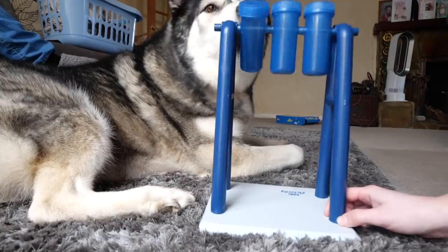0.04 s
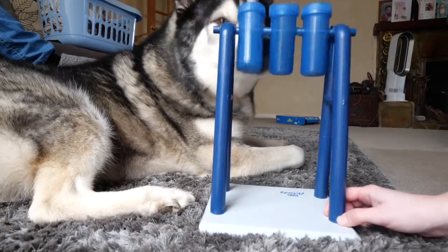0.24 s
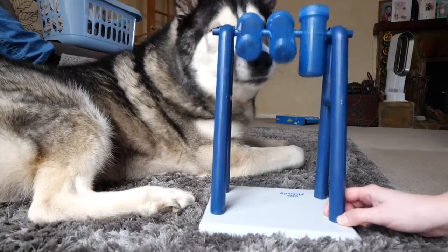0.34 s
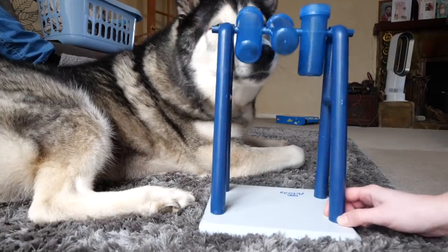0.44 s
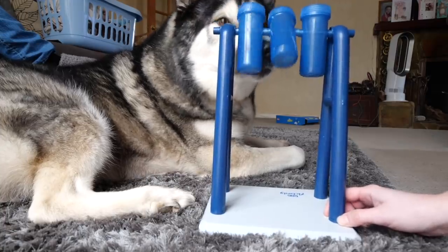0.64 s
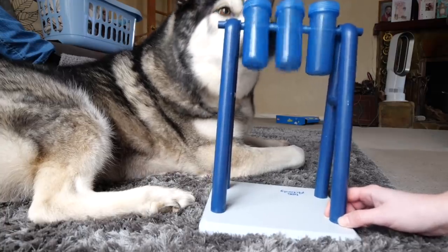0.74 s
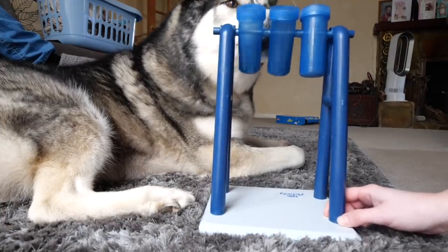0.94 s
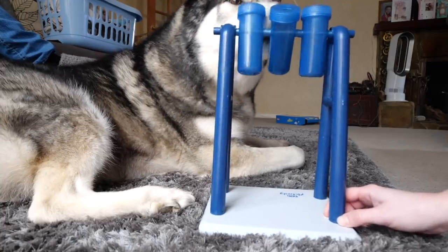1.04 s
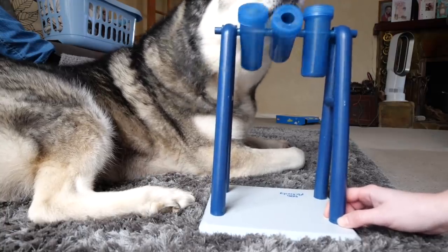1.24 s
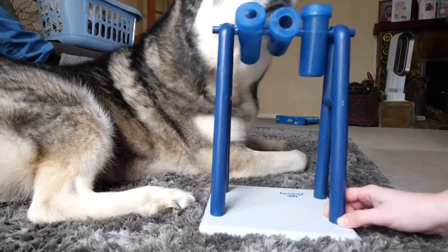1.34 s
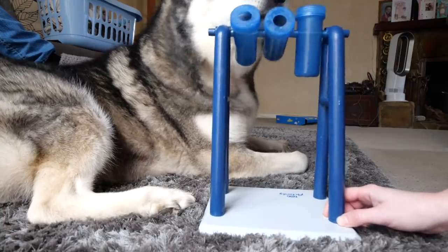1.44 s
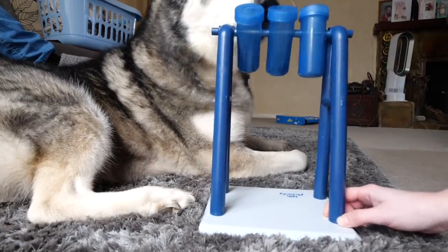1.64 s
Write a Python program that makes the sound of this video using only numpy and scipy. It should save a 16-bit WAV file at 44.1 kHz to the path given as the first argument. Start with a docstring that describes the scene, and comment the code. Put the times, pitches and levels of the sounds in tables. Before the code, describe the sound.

Plastic puzzle toy knocking and clicking under a dog's nose, dry treats tumbling within.

```python
"""A carpeted room: a dog noses a treat puzzle, three hard plastic tubes swinging on a crossbar.
The tubes knock and click against the bar, soft shoves thud through the stand, and dry treats
tumble inside and ping against the tube walls. Each blow is a crack, a noise shudder and ringing
modes; sliding, scraping and pouring are dense tiny impulses. A short room tail follows the blows."""
import sys
import numpy as np
from scipy import signal
from scipy.fft import rfft, irfft
from scipy.io import wavfile
from scipy.ndimage import uniform_filter1d

SR = 44100
rng = np.random.default_rng(int(sys.argv[2]) if len(sys.argv) > 2 else 0)


def unload_audio(sound):
    """Save the sound as a 16-bit wav file, at the path given as the first command line argument."""
    columns = np.transpose(np.atleast_2d(sound))
    # keep every value between -1 and 1, then stretch to whole-number steps
    steps = np.round(np.clip(columns, -1, 1) * 32767)
    wavfile.write(sys.argv[1], SR, steps.astype(np.int16))


N = 74970
SIZE = 16384  # samples per impulse response
HZ = np.maximum(np.fft.rfftfreq(SIZE, 1 / SR), 1)
AGE_S, TIME_S = np.arange(SIZE) / SR, np.arange(N) / SR

# blows: start_s, level_db, tilt_db_per_oct
STAND_SHOVES = [(0.248, -48, -21), (0.3389, -27.5, 3), (0.4559, -32, -4.5), (0.584, -33, 3),
                (0.7245, -38, -4), (0.7386, -34, -2.5), (0.859, -27, 0.5), (0.8889, -24.5, 1.5),
                (1.265, -40.5, -2.5), (1.283, -38, -1.5), (1.3033, -25, 2)]
TREAT_HITS = [(0.3278, -35, 7), (.3808, -38.5, 0), (0.4683, -29, -0.5), (0.5036, -46, 5), (.5694, -22, 14),
              (0.5815, -40, 0), (.5866, -39, 17), (0.6051, -32, 12), (0.747, -31, 3), (0.756, -26, 6),
              (0.773, -31.5, -1), (0.8669, -17.5, -2), (0.8754, -22, 5), (.880, -32, 8), (.9041, -25, 2.5),
              (.9115, -32.5, 3.5), (0.9208, -19, 5.5), (0.9333, -29.5, -2), (.9393, -31, 3),
              (1.0298, -40, -1), (1.0693, -31.5, -4), (1.1238, -43.5, -4), (1.275, -37, 0.5),
              (1.5326, -36.5, 1.5), (1.5699, -35, -6.5)]
TUBE_KNOCKS = [(0.2061, -24.5, 1.5), (0.235, -34.5, 4), (0.247, -28.5, -0.5), (0.3346, -29, -1.5),
               (0.3455, -20.5, 0), (0.3478, -19, 1.9), (0.3534, -26.5, 6), (.358, -22, 1),
               (0.4349, -27.5, -2.5), (0.4489, -26.5, 0.5), (0.6602, -23.5, -1.5), (0.683, -32.5, -6),
               (0.7212, -32, -2.5), (0.813, -33, 0.5), (.896, -30, -4.5), (1.0999, -36.5, -3.5),
               (1.170, -45, -1.5), (1.5992, -36.5, 4.5)]
# plastic on plastic: start_s, level_db, tilt_db_per_oct, crack_share
EDGE_CLICKS = [(0.0251, -36, -2.5, 0.37), (0.0593, -43, -2, 0.94), (0.268, -37, -5.5, 1),
               (0.2723, -27.5, -4.5, 0.92), (0.2803, -31, -6, 0.1), (.2884, -36, -2, 0.3),
               (0.2966, -27.5, -1, 0.04), (.348, -26.5, 5.5, 0.36), (0.4344, -27, -4, 0),
               (0.4445, -31, -1.5, 0.4), (0.5617, -36.5, -8.5, 0.16), (.7487, -30.5, 2.5, 0),
               (0.796, -31.5, -7, 0.8), (0.8343, -30, -2.5, 0), (0.865, -29.5, 26, 0.2),
               (0.8727, -22.5, -3, 1), (0.8753, -29.5, 0, 0.98), (0.9476, -33, -6.5, .3),
               (0.9614, -27, 1.5, 0.53), (0.9746, -35, -2.5, 0.98), (1.3291, -25, 4.5, 0),
               (1.341, -34, 4, 0), (1.3522, -26, 12, 0.14), (1.3637, -39, 8, 0.2), (1.408, -29, 3, 0.6),
               (1.4195, -41, 0, 0.2), (1.4508, -37, 2, .1)]
# treats running down a tube: start_s, length_s, level_db
TREAT_POURS = [(0.741, .05, -36.5), (0.869, .14, -37.5)]
# sliding envelope: time_s, level_db
SLIDE_LEVELS = [(0, -44), (.10, -56.5), (.195, -51.5), (0.237, -40.5), (.47, -43), (.54, -48), (.655, -50),
                (.77, -43), (0.851, -43.5), (.87, -37), (.95, -47), (1.0, -50), (1.11, -49.5), (1.25, -57),
                (1.288, -45.5), (1.49, -50), (1.59, -40), (1.70, -48.5)]
# source spectra: freq_hz, gain_db
HISS_SPECTRUM = [(30, -22), (200, 10), (800, -22), (3000, -13), (10000, 0), (16000, -19)]
SLIDE_SPECTRUM = [(40, -38), (210, 4), (450, -5), (780, 6), (1150, -2.5), (2100, 0.5), (4500, -6.5),
                  (5600, -4.5), (7500, -11.5), (9800, -13), (12000, -20), (16000, -33)]
THUD_SPECTRUM = [(30, -20), (120, -20.5), (225, 2.5), (350, -2.5), (500, -8), (630, -7.5), (900, 6.5),
                 (1400, -10.5), (2200, -14.5), (4000, -41), (16000, -70)]
CLICK_SPECTRUM = [(60, -36), (240, -24), (800, -14), (2200, 3.5), (3900, 1.5), (5600, 1.5), (8000, -1.5),
                  (9800, 0), (12500, -19), (16000, -32)]
TREAT_SPECTRUM = [(60, -37), (280, -35), (1500, -4.5), (3000, -4), (3750, 5.5), (4400, -0.5), (5600, 6),
                  (8000, -4.5), (9800, -6), (12500, -23), (16000, -45)]
KNOCK_SPECTRUM = [(60, -55), (200, -11.5), (620, -10.5), (890, 6), (1150, -5.5), (1500, 0), (2150, -0.5),
                  (2700, -14), (3900, -9), (6000, -23), (10000, -28), (16000, -43)]
# resonances: pitch_hz, level_db, t60_s
STAND_RING = [(220, -1.4, .075), (429, 0.28, 0.056), (522, -2, 0.059), (781.6, -2.6, 0.094),
              (908.4, 0.76, 0.072)]
WALL_RING = [(3731, 1.5, 0.08), (5370, -1.5, 0.06), (5550, -1, 0.098), (6030, -0.5, 0.031)]
TUBE_RING = [(722, 1, 0.44), (798, -1, 0.04), (940, -19, 0.059), (1343, -10, 0.72), (1423, 1.5, 0.087),
             (1833, -5.5, 0.16), (2113, 5, 0.077), (2320, -8, 0.059)]
# room band decay, before the tail's overall fade: freq_hz, t60_s
ROOM_DECAY = [(150, 0.9), (1000, 0.02), (3000, 0.57), (8000, 1.2), (15000, 0.54)]
# room tail spectrum: freq_hz, gain_db
ROOM_SPECTRUM = [(80, -12.5), (200, -8), (450, -9), (1000, -11.5), (5500, -8.5), (15000, -17.5)]
# stereo balance: freq_hz, left_minus_right_db
BALANCE = [(250, 0), (700, -2), (1600, -3), (11000, 1)]
# stereo width: freq_hz, side_gain_db
WIDTH = [(50, 0), (160, -22.5), (1400, -11.5), (9000, -21.5), (14000, 0)]


def from_db(db):
    """Decibels to gain."""
    return 10 ** (np.asarray(db) / 20)


def unit(x):
    """Scale to unit energy."""
    return x / np.sqrt(np.sum(x ** 2) + 1e-20)


def at_hz(table, hz=HZ):
    """Interpolate over log frequency."""
    freqs_hz, values = np.transpose(table)
    return np.interp(np.log(hz), np.log(freqs_hz), values)


def fade(t60_s):
    """Free decay, 60 dB in t60_s."""
    return np.exp(-np.log(1000) * AGE_S / t60_s)


def causal(gain_db):
    """Minimum-phase impulse response of a gain curve."""
    cepstrum = irfft(gain_db * np.log(10) / 20)
    fold = 1 + np.sign(SIZE // 2 - np.arange(SIZE)) - (AGE_S == 0)
    return irfft(np.exp(rfft(cepstrum * fold)))


def through(x, response):
    """Filter x, keeping its length."""
    return signal.fftconvolve(x, response)[:len(x)]


def evened(x, t60_s):
    """Flatten a burst's chance spectral peaks, then fade it; unit energy."""
    spectrum = rfft(x)
    flat = irfft(spectrum / np.sqrt(np.abs(spectrum) ** 2 + np.sum(x ** 2) / 10))
    return unit(flat * fade(t60_s))


def dying_noise(t60_s_at):
    """Dense resonances: 12 noise bands, each with its own decay; unit energy."""
    edges_hz = np.geomspace(100, 18000, 13)
    white = rfft(rng.standard_normal(SIZE))
    out = 0
    for low, high in zip(edges_hz, edges_hz[1:]):
        band = irfft(white * (HZ >= low) * (HZ < high))
        out += np.sqrt(high - low) * unit(band * fade(t60_s_at(np.sqrt(low * high))))
    return unit(out)


def ringing(modes, scatter_db=4.5, detune=0.003):
    """Struck modes rising over one cycle; level and pitch vary per blow; unit energy."""
    out = 0
    for k, (pitch_hz, level_db, t60_s) in enumerate(modes):
        gain = (-1) ** k * from_db(level_db + scatter_db * rng.normal())
        tone = np.cos(2 * np.pi * pitch_hz * (1 + detune * rng.normal()) * AGE_S)
        out += gain * unit(tone * np.minimum(pitch_hz * AGE_S, 1) * fade(t60_s))
    return unit(out)


def contact(spectrum, crack_share, decay_s, swell_s=0.00061):
    """A crack plus a shudder that swells as the plastic flexes, treble dying first; unit energy."""
    shudder = dying_noise(lambda hz: decay_s * (1000 / hz) ** 0.74)
    shudder = evened(shudder, 2 * decay_s) * (1 - np.exp(-AGE_S / swell_s))
    burst = np.sqrt(crack_share) * (AGE_S == 0) + np.sqrt(1 - crack_share) * unit(shudder)
    return unit(through(burst, causal(at_hz(spectrum))))


def add_blow(track, start_s, level_db, tilt_db_per_oct, attack, ring, window_s=0.005):
    """Tilt and mix in one blow; level_db is the attack's energy spread over window_s."""
    slope = causal(tilt_db_per_oct * np.log2(np.clip(HZ, 200, 12000) / 1000))
    gain = from_db(level_db) * np.sqrt(window_s * SR / np.sum(through(attack, slope) ** 2))
    start = int(start_s * SR)
    track[start:start + SIZE] += gain * through(attack + ring, slope)[:N - start]


def grains(spectrum, rate_per_s):
    """Tiny slips: equal impulses of random sign and timing, filtered; unit rms."""
    slips = rng.choice([-1, 1], N) * (rng.random(N) < rate_per_s / SR)
    return np.sqrt(N) * unit(through(slips, causal(at_hz(spectrum))))


def room_tone(level_db=-60):
    """Faint steady hiss."""
    hiss = through(rng.standard_normal(N), causal(at_hz(HISS_SPECTRUM)))
    return from_db(level_db) * np.sqrt(N) * unit(hiss)


def room_tail(x, onset_s=0.0013):
    """Short tail of a furnished room, different for each spot on the toy."""
    tail = evened(dying_noise(lambda hz: at_hz(ROOM_DECAY, hz)), t60_s=0.31)
    tail *= np.clip(AGE_S / onset_s - 1, 0, 1)
    return through(x, through(unit(tail), causal(at_hz(ROOM_SPECTRUM))))


def sliding():
    """Tubes turn on the bar and treats slide inside: dense tiny slips."""
    level_db = np.interp(TIME_S, *np.transpose(SLIDE_LEVELS))
    return from_db(level_db) * grains(SLIDE_SPECTRUM, rate_per_s=2500)


def scrape(hits, span_s=0.012, gain_db=-11.5):
    """Parts scuff along each other just before and after they hit."""
    power = hits ** 2
    for _ in range(2):
        power = uniform_filter1d(power, int(span_s * SR))
    return from_db(gain_db) * np.sqrt(np.abs(power)) * grains(CLICK_SPECTRUM, rate_per_s=2100)


def pouring():
    """Jostling treats: a bright crunch that starts at once and runs out."""
    flow = 0
    for start_s, length_s, level_db in TREAT_POURS:
        remaining = np.clip(1 - (TIME_S - start_s) / length_s, 0, 1)
        flow += from_db(level_db) * (TIME_S > start_s) * np.sqrt(remaining)
    return flow * grains(TREAT_SPECTRUM, rate_per_s=700)


def stand_thuds():
    """Soft shoves carried by the posts and base."""
    out = np.zeros(N)
    for blow in STAND_SHOVES:
        attack = contact(THUD_SPECTRUM, crack_share=0.11, decay_s=0.038)
        add_blow(out, *blow, attack, from_db(-1.5) * ringing(STAND_RING))
    return out


def edge_clicks():
    """Hard plastic edges meet: dry clicks, faint wall ring."""
    out = np.zeros(N)
    for *blow, crack_share in EDGE_CLICKS:
        attack = contact(CLICK_SPECTRUM, crack_share, decay_s=0.035)
        add_blow(out, *blow, attack, from_db(-9.5) * ringing(WALL_RING, detune=0.009))
    return out


def treat_hits():
    """Treats strike the tube wall: a brief swelling ping, then a ring that varies by spot."""
    out = np.zeros(N)
    for start_s, level_db, tilt_db_per_oct in TREAT_HITS:
        pitch_hz = 5523 + 28.3 * tilt_db_per_oct  # shorter, brighter touches ping higher
        loss_db = 0.6 * tilt_db_per_oct  # bright, glancing hits ring less
        ping = unit(np.sin(2 * np.pi * pitch_hz * AGE_S) * AGE_S * fade(t60_s=0.0044))
        attack = contact(TREAT_SPECTRUM, crack_share=0.13, decay_s=0.03)
        attack += from_db(-max(loss_db, 0)) * ping
        ring = from_db(-5 - loss_db) * ringing(WALL_RING, detune=0.012)
        add_blow(out, start_s, level_db, tilt_db_per_oct, attack, ring)
    return out


def tube_knocks():
    """Hollow tubes strike the bar; harder knocks ring more."""
    out = np.zeros(N)
    for start_s, level_db, tilt_db_per_oct in TUBE_KNOCKS:
        attack = contact(KNOCK_SPECTRUM, crack_share=0.52, decay_s=0.035)
        ring = from_db(9 + 0.68 * level_db) * ringing(TUBE_RING)
        add_blow(out, start_s, level_db, tilt_db_per_oct, attack, ring)
    return out


def scene():
    """Toy close, slightly right; reflections differ per channel."""
    knocks, thuds, clicks = tube_knocks(), stand_thuds(), edge_clicks()
    sources = knocks, thuds, clicks + scrape(clicks), treat_hits() + pouring()
    mid = sum(blows + room_tail(blows) for blows in sources) + sliding() + room_tone()
    reflections = evened(rng.standard_normal(SIZE) * fade(t60_s=0.23), t60_s=0.27)
    side = through(mid, through(reflections, causal(at_hz(WIDTH))))
    return np.array([through(mid + sign * side, causal(sign * at_hz(BALANCE) / 2)) for sign in (1, -1)])


def record(dry):
    """Clip at full scale, then low-pass steeply."""
    cutoff_hz = 15800
    lowpass = signal.ellip(10, 0.1, 80, cutoff_hz, fs=SR, output="sos")
    return signal.sosfilt(lowpass, np.clip(dry, -1, 1))


dry = scene()
out = record(dry)
unload_audio(out)
```